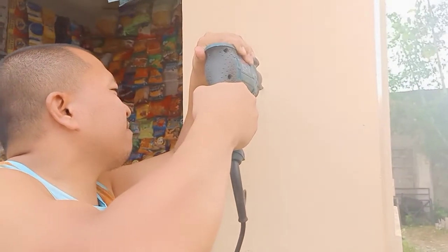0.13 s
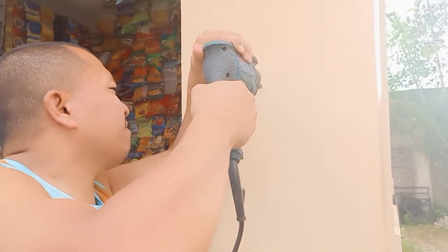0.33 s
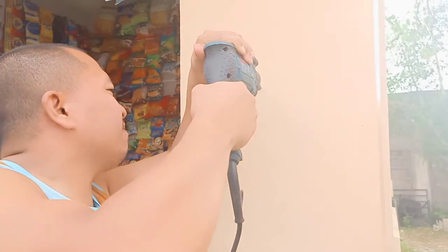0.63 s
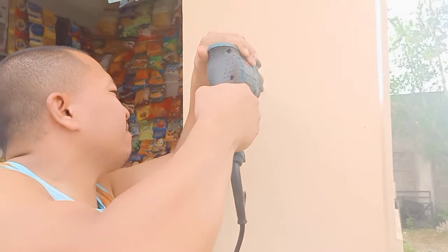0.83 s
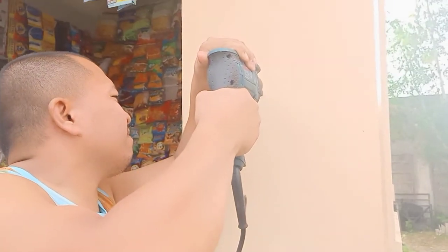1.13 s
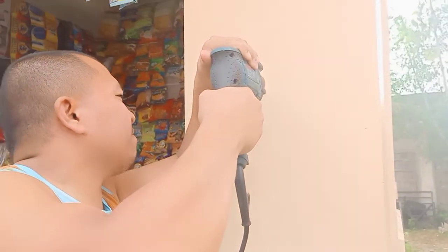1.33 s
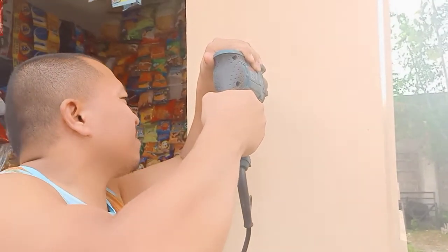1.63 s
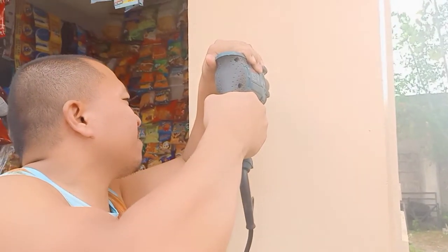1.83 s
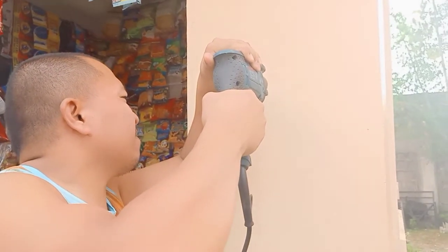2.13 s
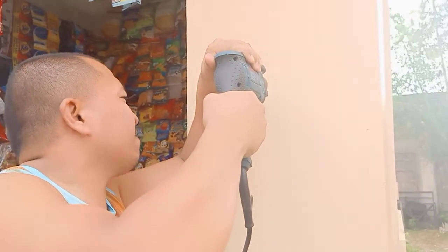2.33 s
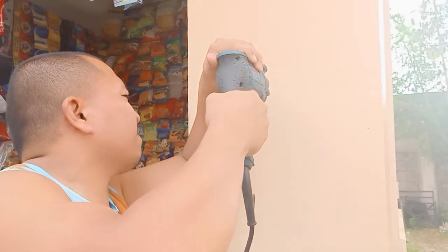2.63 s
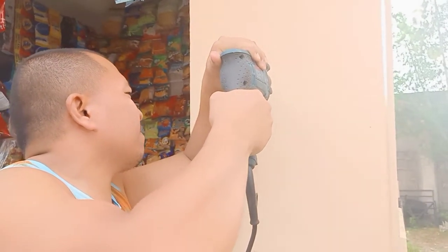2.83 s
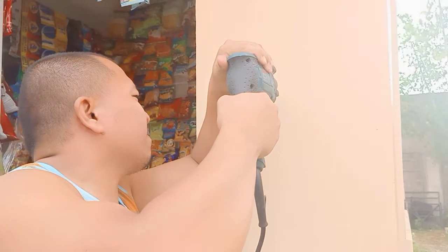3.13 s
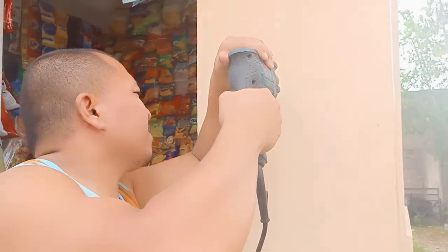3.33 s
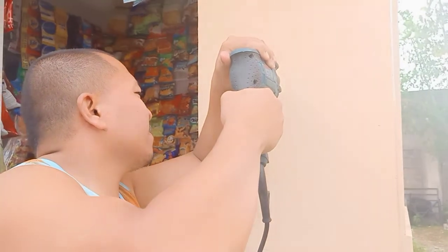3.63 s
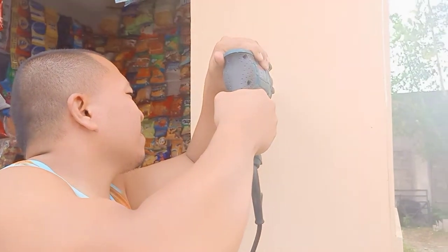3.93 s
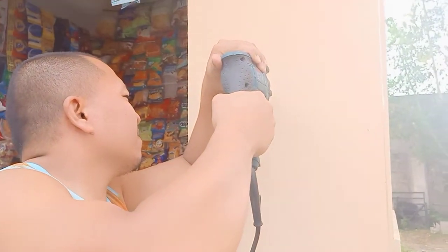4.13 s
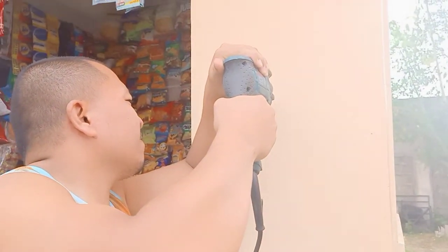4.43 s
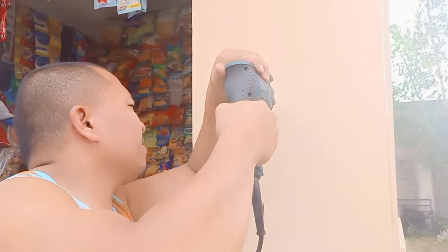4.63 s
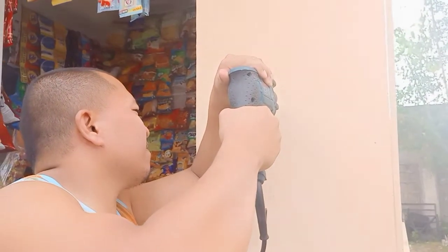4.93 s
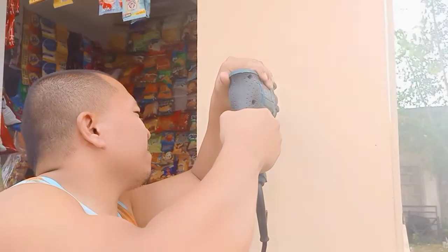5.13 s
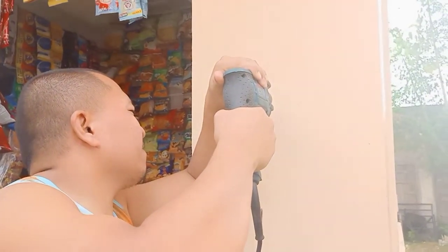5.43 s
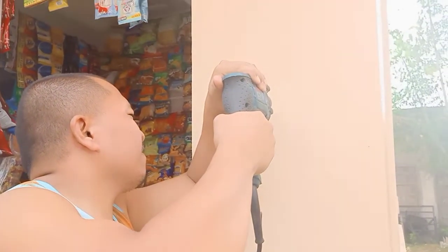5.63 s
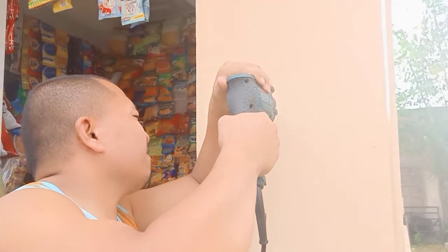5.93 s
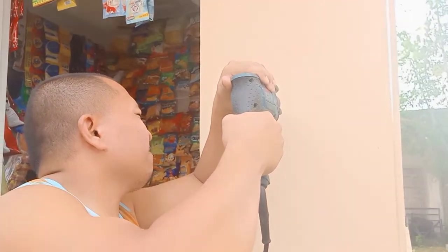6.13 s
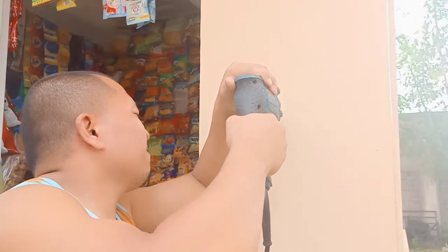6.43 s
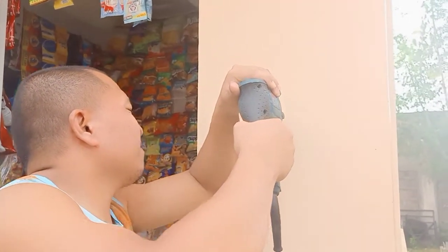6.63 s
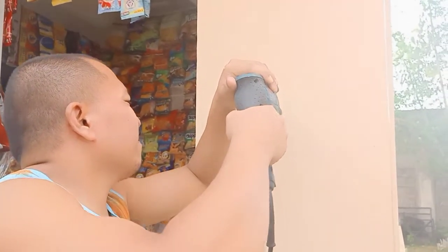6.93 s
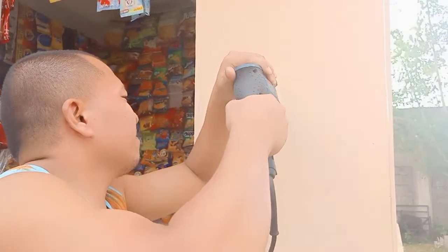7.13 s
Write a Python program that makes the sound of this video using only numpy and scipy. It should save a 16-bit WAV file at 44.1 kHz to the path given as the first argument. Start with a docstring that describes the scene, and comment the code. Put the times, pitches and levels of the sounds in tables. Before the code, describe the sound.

An electric drill grinds steadily into a wall, squealing and rattling, surges to a faster whine, then winds down amid low wind thumps.

```python
"""Outdoors at a plastered wall: a corded drill bores in, heard close up by two microphone ports.
Shaft-locked tones make the gear whine, inside a noise roar and fan hiss that throb twice a turn.
Noise bands and short narrow-band cries make the bit rub and squeal; loose parts rattle and knock.
The trigger is squeezed harder, the motor races, then coasts down. Shaped noise and blunt pushes
are the wind buffeting the ports."""
import sys
import numpy as np
from scipy.fft import rfft, irfft, next_fast_len
from scipy.io import wavfile
from scipy.ndimage import map_coordinates

SR = 44100
rng = np.random.default_rng(int(sys.argv[2]) if len(sys.argv) > 2 else 0)


def to_wav(sig):
    """Store sig (one row per channel, or 1-D mono) as 16-bit WAV at the path in sys.argv[1].

    Samples outside -1..1 are clipped; the rate is SR.
    """
    pcm = np.clip(np.atleast_2d(sig), -1, 1) * 32767
    pcm = np.round(pcm).astype(np.int16)
    wavfile.write(sys.argv[1], SR, pcm.T)  # frames by channels


N = 321930

# Listed levels are settings ahead of the modulation and trims in the functions.
# Left-right dB is positive towards the left; spectra give relative density.

# Breeze over time. Each row: time in seconds, strength in dB, left-right in dB.
BREEZE = [(0, -41.5, 7), (.3, -38.5, -9), (.5, -43.5, -6.5), (.85, -48.5, 11), (1.2, -49, 1),
          (1.5, -41.5, 3), (1.8, -47, 17), (2.2, -52, 16), (3.4, -50.5, 5.5), (3.65, -46.5, 16),
          (3.86, -37, 4.5), (4.5, -37.5, 2), (4.75, -42, 7), (5.05, -34.5, 12.5), (5.4, -36.5, 7),
          (5.78, -52, 6), (5.95, -46, 2), (6.35, -40.5, 17.5), (6.46, -53.5, 18), (6.55, -52.5, 7),
          (6.66, -52, 3), (6.76, -38, 11), (6.95, -44.5, 8), (7.13, -43, 8), (7.18, -58, 14),
          (7.3, -51, -4)]
# Single buffets. Each row: start in seconds, peak in dB, left-right in dB, flutter over the buffet in dB.
BUFFETS = [(.03, -41.5, 9, 5), (0.046, -44, -19, 8), (.14, -42.5, -17, 3.5), (.186, -39, -12, 2),
           (0.237, -34, -5, 5), (.275, -41, 8, -6), (.303, -47, -9, 4), (0.387, -38, -15, 2),
           (0.45, -33, -3.5, -6), (0.681, -33.5, 9, -4), (1.29, -37, 0, -17), (1.39, -38.5, 13, 4),
           (1.47, -40, -14, 4), (1.748, -42, -16, 3), (1.96, -44.5, 28, -11), (2.81, -45.5, 20, -15),
           (3.181, -37.5, 11, -3), (3.49, -43, 14, -9), (3.682, -38, 27, -5), (3.848, -35.5, 7, 0),
           (3.938, -40, -7, 9), (3.977, -30, 2, 7), (4.082, -25, 12.5, -2), (4.125, -34, 10, -5),
           (4.149, -27.5, 6, 3), (4.221, -32, -6, 0), (4.412, -26.5, 8.5, 9), (4.432, -34, 2, 1),
           (4.463, -37, -6, 5), (4.515, -37, 9, 5), (4.631, -41.5, -7, 6), (4.848, -34, 23, -18),
           (4.947, -38, -17, -0.5), (5.03, -30.5, 15, 2), (5.109, -31.5, 18, -9), (5.18, -42, 16, 7),
           (5.851, -39, -0.5, -2), (5.959, -42, -17, 6), (6.029, -42.5, -11, 7), (6.21, -41, 21, -14),
           (6.41, -46, 18, 3), (6.675, -41, -9, -1), (6.71, -36.5, 12, 5), (6.79, -37.5, 22, 2.5),
           (6.85, -35, 17, -2), (6.9, -45, 9, 4), (7.11, -46, 20, -1)]
# Low rush of the wind and its higher flutter. Each row: frequency in Hz, density in dB per Hz.
BUFFET_SPECTRUM = [(15, -80), (30, -47), (50, -11.5), (97, 1.5), (188, -1.5), (221, -3.5), (267, -5),
                   (400, -14.5), (520, -64), (880, -120)]
FLUTTER_SPECTRUM = [(120, -29), (200, -1), (397, 3), (434, 1.5), (551, -1.5), (900, -18), (1170, -24),
                    (1980, -120)]
BUFFET_RISE_S, BUFFET_FALL_S = 0.00883, 0.013
BUFFET_CROSS_S = .016  # a buffet passes the left port first
THUMP_DB = -2  # front of a buffet, over its listed peak
# Flutter over a breeze of -42.5 dB, extra dB per dB of breeze, and its left-right shift
BREEZE_FLUTTER_DB, FLUTTER_GROWS, FLUTTER_PAN_DB = -3.5, 0.59, -7.5

# Likeness of the two ports. Each row: frequency in Hz, left-right correlation.
ALIKE = [(300, 1), (700, 0.99), (1250, 0.98), (1650, 0.79), (2400, 0.69), (3150, 0.23), (3900, 0.27),
         (4700, 0.12), (7000, 0.39), (9900, 0.14), (15000, 0.37)]
# Balance of the drill. Each row: frequency in Hz, left-right in dB.
LEAN = [(400, -1.5), (770, 2), (1170, -1.5), (1790, -0.1), (2740, -3), (4190, -7.5), (6410, -3.5),
        (8200, 10.5), (9800, 2), (10800, -2), (11400, -0.5), (12500, -0.5), (15000, -1)]
# Phase of the drill between ports. Each row: frequency in Hz, lead of the left in radians.
LEAD = [(800, -0.38), (1650, 0.74), (2400, -1), (3150, -0.6), (3900, -1.5), (4700, -0.33), (8400, -1.33),
        (11400, 0.23)]
TOP_HZ = 15725

# Chuck rattles. Each row: start in seconds, peak in dB, pitch in Hz, knock of the housing in dB.
RATTLES = [(2.074, -38, 3700, -40), (2.48, -30, 3600, -36), (2.584, -37, 3760, -38),
           (2.613, -35, 3770, -34), (3.28, -28.5, 3780, -38), (4.678, -32, 3700, -36),
           (4.7085, -18.5, 3200, -30), (4.759, -29, 3650, -33), (4.809, -33, 3800, -32),
           (4.856, -29, 3800, -28), (4.902, -27, 3400, -27), (4.948, -35, 3700, -29),
           (5.033, -29, 3700, -30), (5.112, -27, 4300, -32), (5.151, -27, 3850, -27),
           (5.189, -26, 4280, -35), (5.228, -27, 3920, -31), (5.301, -28, 4300, -34),
           (6.387, -26, 4060, -28), (6.493, -20, 2580, -33), (6.528, -20, 2520, -33),
           (6.564, -23, 2620, -29), (6.6, -23, 2530, -28), (6.746, -28, 2600, -33), (6.801, -27, 2710, -31),
           (6.808, -28, 2600, -35), (6.846, -32, 2400, -33), (6.886, -37, 3700, -32),
           (7.0, -25.5, 3800, -27), (7.045, -20, 3800, -28), (7.047, -32, 1750, -32),
           (7.068, -28, 3800, -40), (7.0698, -27, 2600, -27), (7.088, -31, 3500, -35),
           (7.093, -26, 3950, -33), (7.095, -29, 1640, -31), (7.118, -31, 2250, -36),
           (7.14, -28.5, 3600, -32), (7.166, -27, 2850, -39), (7.184, -28.5, 2750, -39),
           (7.235, -33, 2750, -40)]
# Snap of the housing under a rattle. Each row: frequency in Hz, density in dB per Hz.
SNAP_SPECTRUM = [(500, -60), (1100, -8), (1700, -1), (2550, 0), (3300, 0), (4200, -3), (4800, -10),
                 (7000, -12), (9000, -60)]
RATTLE_PAN_DB, RATTLE_PAN_DB_PER_KHZ = -9.5, 1  # left-right at 2.6 kHz; higher rattles lean less to the right

# The bit grabs the side of the hole. Each row: start in seconds, peak in dB, pitch in Hz.
SQUEAKS = [(.1055, -31, 8300), (.2107, -23.5, 8170), (.2798, -20, 8170), (.3315, -21, 8350),
           (.38, -33, 8100), (.4379, -29, 8140), (1.0006, -30, 8740), (1.05, -32.5, 8450),
           (1.0979, -36, 8090), (2.095, -22.5, 8360), (2.1448, -27, 8340), (2.198, -25.5, 8500),
           (2.3536, -26, 8420), (2.494, -31, 8500), (2.5466, -33, 8640), (3.021, -33, 9200),
           (3.4371, -34, 9400), (3.5418, -31, 9350), (3.697, -34, 8800), (3.7559, -30, 8900),
           (4.243, -30, 8250), (4.2686, -26.5, 9800), (4.3071, -28.5, 8800), (4.4233, -26.5, 8970),
           (4.5625, -28.5, 8800), (4.6159, -31, 8400), (4.6663, -29.5, 8500), (4.8693, -34, 9640),
           (4.9726, -29, 9300), (5.101, -18, 10050), (5.1402, -23, 8900), (5.1731, -27, 9550),
           (5.248, -31, 8300)]
# Grabs once a turn. Each row: time in seconds, peak in dB, pitch in Hz, scatter in Hz, angle in turns.
RUN = [(5.34, -35, 9600, 500, 0), (5.85, -29, 9600, 500, 0.003), (6.03, -26.5, 8920, 150, 0.051),
       (6.22, -25, 8520, 80, 0), (6.46, -30.5, 8080, 80, 0.2)]
SQUEAK_PAN_DB, PAN_DB_PER_KHZ = 20, -6  # left-right at 8.3 kHz; higher squeaks are nearer the middle

# The rubbing bit. Each row: time in seconds, rub in dB, ring in dB, chirp pitch in Hz.
BIT = [(0, -51, -68, 9900), (.6, -61.5, -69, 9750), (1.9, -63, -66, 9200), (2.35, -50.5, -55, 9400),
       (2.7, -49, -58.5, 10500), (3.1, -50.5, -47, 10850), (3.35, -49, -53, 10200), (4, -51.5, -51, 9940),
       (4.15, -46, -43, 9940), (4.75, -44.5, -44.5, 9740), (5, -46, -36.5, 10000),
       (5.15, -40.5, -37.5, 9700), (5.3, -44, -41.5, 9900), (5.7, -43, -39.5, 10050), (6, -42, -43, 9620),
       (6.3, -43.5, -41, 9060), (6.45, -56, -53, 9000), (6.62, -59, -51, 9800), (6.75, -59, -64, 10500),
       (7.3, -64, -68, 10300)]
# Rasp of the rub. Each row: frequency in Hz, density in dB per Hz.
RUB_SPECTRUM = [(4710, 2), (8000, -4), (8300, -21.5), (9040, 21.5), (10800, 19), (11200, -14), (14600, -41),
                (22000, -120)]
# Where the side of the bit catches. Each row: time in seconds, angle in turns.
CATCH = [(0, 0.86), (2.8, 0.77), (3.6, 0.93), (4.4, 0.9), (5.3, 0.98), (7.3, .96)]
# Level of the highest treble, which comes and goes. Each row: time in seconds, level in dB.
TREBLE = [(0, -52), (4, -54.5), (4.15, -67), (5, -67), (5.3, -46), (6, -42), (6.25, -45), (6.4, -54),
          (6.85, -61), (7.3, -60)]
# High noise around and above the ring, under load and racing. Each row: frequency in Hz, density in dB per Hz.
HIGH_LOADED = [(6240, -9.5), (10900, -7.5), (11300, 0), (12200, -1), (12600, -11), (13100, -5), (13800, -9),
               (15600, -30)]
HIGH_RACING = [(6820, -35), (11600, -6), (12000, 1), (12700, 5), (13500, -7), (14200, -20), (14400, -37),
               (15600, -67)]
RING_HZ, RING_WIDTH_HZ = 11410, 320  # long-axis mode of the bit
CHIRP_DB, CHIRP_RACING_DB = 13.5, -2.5  # over the rub; change at full speed
# A flute clips the hole's edge at this turn: its ring and its chirp over the steady ring
PING_TURN, PING_DB, PING_CHIRP_DB = .56, 9, 5.5

# Plaster chips heard through the housing. Each row: frequency in Hz, density in dB per Hz.
CHIP_SPECTRUM = [(500, -60), (1100, -10), (1700, 0.5), (2100, -3.5), (2550, 6.5), (3300, 1), (4200, -12),
                 (7000, -8.5), (9000, -60)]
CHIPS_PER_S, CHIP_SPREAD_DB, CHIPS_DB = 900, 6, -9  # average rate; scale of sizes; over the listed roar

# Chuck speed. Each row: time in seconds, speed in turns per second.
SPEED = [(0, 18.99), (.15, 19.01), (.45, 19.28), (.75, 19.62), (.9, 19.85), (1.2, 19.97), (1.35, 19.78),
         (1.5, 19.42), (1.8, 19.55), (2.3, 19.35), (2.7, 19.4), (3.45, 19.19), (3.6, 19.2), (4.05, 19.44),
         (4.2, 19.37), (4.35, 19.38), (4.65, 19.29), (4.73, 19.39), (4.78, 20.6), (4.88, 21.7),
         (4.95, 22.75), (5.05, 24.4), (5.15, 25.95), (5.25, 27.2), (5.35, 28.05), (5.45, 28.95),
         (5.6, 29.75), (5.75, 30.43), (5.9, 30.78), (6.3, 31.45), (6.38, 31.2), (6.4, 30.87), (6.6, 26.46),
         (6.9, 22.13), (7.3, 19.79)]
START_TURN = .03
SQUEEZE_S, RELEASE_S = 4.76, 6.38  # trigger pulled fully, let go
# Roar. Each row: time in seconds, level in dB.
ROAR = [(0, -31.5), (.71, -31), (1.36, -31.5), (2.77, -32), (4.65, -32), (4.9, -29.5), (5.2, -27),
        (5.31, -28), (5.71, -26), (5.88, -27.5), (6.18, -27), (6.69, -32.5), (7.01, -34.5), (7.08, -33.5),
        (7.22, -36), (7.3, -37)]
# Housing roar under load and racing. Each row: frequency in Hz, density in dB per Hz.
ROAR_LOADED = [(240, -22), (400, -14), (470, -8), (514, -15.5), (610, -7.5), (807, -8), (1160, -2),
               (1360, -5), (1630, -4), (1860, -5.5), (2390, -1), (3040, -3), (3190, -2), (3560, -9),
               (4400, -18.5), (5720, -51), (9680, -120)]
ROAR_RACING = [(240, -56), (400, -17.5), (709, -5), (816, -10.5), (1050, 1), (1490, 3), (1660, -6),
               (1990, 1), (2430, 1), (2590, 0), (3100, -4), (3360, -7.5), (3640, -9.5), (3860, -18),
               (4400, -10), (5720, -76), (9680, -120)]
# Shell modes of the housing. Each row: centre in Hz, width in Hz, level under load in dB.
HOUSING = [(1150, 54, -60.5), (2325, 70, -48), (2550, 63, -53.5), (3067, 53, -54), (3363, 77, -62)]
# Rise of each shell mode at full speed, in dB.
HOUSING_RISE = [-2.5, 4, -7, -12, 15]
# Fan and grit hiss. Each row: frequency in Hz, density in dB per Hz.
HISS_SPECTRUM = [(2240, -45), (3800, -3.5), (4130, -10), (5470, -1.5), (6100, 3), (6600, 3), (7120, 5),
                 (8110, -0.5), (8280, 0), (9000, -10), (11700, -44), (19800, -120)]
HISS_DB, HISS_GROWS = -40.5, 1.65  # while boring; dB of hiss per dB of roar
HISS_COAST_DB = 1.5  # lift of the fan hiss against the falling roar
WALL_HZ, WALL_COAST = 547, 0.73  # below this the wall hums with the cutting; share lost without current

# Gear and motor tones. Each entry: vibrations per chuck turn.
ORDERS = [42, 84, 126, 168, 252, 410, 120, 132]
# Speeds at which the tone levels are set, in turns per second.
TONE_SPEEDS = [20, 20.35, 23.5, 26.4, 27.7, 29, 30.2, 30.6, 31.05, 31.4]
# Tones sweeping through the housing's resonances. Each row: level in dB at each of those speeds.
# In order: tooth rate, its 2nd, 3rd, 4th and 6th multiples, commutator,
# then the 3rd less and plus one turn of the rotor.
TONES = [
    [-69, -70, -40, -50, -56, -48, -48, -46, -48, -51],
    [-47, -52, -54, -44, -38, -44, -42, -36, -35, -35.5],
    [-40.5, -36.5, -37, -35.5, -41.5, -53, -50, -48, -45, -48],
    [-43.5, -48, -56, -60, -62, -62, -60, -57, -56, -57],
    [-62, -57, -50, -59, -50, -54, -43, -51, -53, -60],
    [-50.5, -62, -66, -69, -70, -70, -70, -70, -70, -70],
    [-47.5, -49, -53, -50, -60, -65, -65, -65, -65, -65],
    [-47.5, -54, -58, -60, -62, -65, -63, -65, -65, -65],
]
# Swing of each tone twice a turn, as a share of its level; 1 reaches silence.
THROB = [.8, 1.6, 1.0, 1.4, .5, .1, .3, .3]
# Backlash shake of each tone, as a scale in radians.
BLUR = [.3, .17, .4, .42, .4, .3, .55, .55]
# Lead and lag of each tone twice a turn, in radians.
SWAY = [0, .25, -.4, -.35, .2, 0, 0, 0]
# Unsteadiness of each tone, in dB.
SCATTER = [1.5, .9, 1.7, 1.4, 1.2, 1.2, 2.4, 2.4]
# Drift of each tone as the hole deepens, in dB per second.
DEEPENING = [0.1, 0.1, -2.2, 0.1, 0.1, -2.5, -.1, .1]
# Change of each tone without current, in dB.
COAST = [-10, -8, -22, -7, -2, -16, -8, -8.5]
COAST_S = 0.17  # time for the coasting change to complete

SIDES = np.array([[.5], [-.5]])  # splits a left-right dB between the ports


def amp(db):
    """Gain of a level in dB."""
    return 10 ** (np.asarray(db) / 20)


def unit(x):
    """Scaled to rms 1."""
    return x / np.sqrt(np.mean(x ** 2) + 1e-20)


def along(points, hz):
    """(Hz, value) points joined on a log frequency axis."""
    f, v = np.transpose(points)
    return np.interp(np.log(hz + 1), np.log(f + 1), v)


def curves(rows):
    """One value per sample for each column after the time."""
    s, *cols = np.transpose(rows)
    return np.array([np.interp(np.arange(N) / SR, s, c) for c in cols])


def wobble(rate):
    """A smooth random curve, rate knots a second."""
    return map_coordinates(rng.standard_normal(int(N * rate / SR) + 4), [np.arange(N) * rate / SR])


def filtered(x, response):
    """Sound shaped by a response of frequency."""
    m = next_fast_len(N + 8192)
    return irfft(rfft(x, m) * response(np.fft.rfftfreq(m, 1 / SR)), m)[..., :N]


def rush(spectrum, alike=ALIKE):
    """Stereo noise of a given colour and left-right likeness, whose mid has rms 1."""
    def mid_side(hz):
        turn = np.arccos(np.clip(along(alike, hz), -1, 1)) / 2
        return amp(along(spectrum, hz)) * [np.cos(turn), np.sin(turn)]

    mid, side = filtered(rng.standard_normal((2, N)), mid_side)
    return np.array([mid + side, mid - side]) / np.std(mid)


def resonance(centre_hz, width_hz, alike=ALIKE):
    """Noise ringing in one mode."""
    hz = centre_hz + width_hz * np.linspace(-12, 12, 97)
    density_db = -20 * np.log10(1 + (2 * (hz - centre_hz) / width_hz) ** 2)
    return rush(np.c_[hz, density_db], alike)


def bursts(events, rise, t60, spread_hz, rough, gain_db):
    """Short narrow-band cries: three close partials under a quick swell and a decay of varied length."""
    out, t = np.zeros((2, N + SR)), np.arange(SR // 20) / SR
    chance = rng.uniform(-1.37, 1, (len(events), 6))
    for (s, db, hz, pan_db), c in zip(events, chance):
        swell = np.sin(np.pi / 2 * np.clip(t / rise, 0, 1)) ** 2
        decay = amp(-60 * np.maximum(t - rise, 0) / (t60 * amp(6.6 * c[0])))
        above_hz = hz + spread_hz * (1 + .5 * c[1])
        below_hz = hz - spread_hz * (1 + .5 * c[3])
        tone = np.sin(2 * np.pi * hz * t)
        tone += rough * np.sin(2 * np.pi * above_hz * t + np.pi * c[2])
        tone += rough * np.sin(2 * np.pi * below_hz * t + np.pi * c[4])
        out[:, round(s * SR):][:, :len(t)] += amp(db + gain_db + SIDES * pan_db) * swell * decay * tone
    return out[:, :N]


def angle():
    """Chuck angle in radians, summed from its speed."""
    return 2 * np.pi * (np.cumsum(curves(SPEED)[0]) / SR + START_TURN)


def racing():
    """0 up to 20 turns per second, 1 from 27 upwards."""
    return np.clip((curves(SPEED)[0] - 20) / 7, 0, 1)


def coasting():
    """0 under current, ramping to 1 once the trigger is let go."""
    return np.clip((np.arange(N) / SR - RELEASE_S) / COAST_S, 0, 1)


def passes(turn):
    """Samples at which the chuck passes an angle, given in turns."""
    return np.flatnonzero(np.diff(np.floor(angle() / (2 * np.pi) - turn)))


def each_turn(turn, db, hz, scatter):
    """One cry a turn, scattered in time, level and pitch: rows (s, peak dB, Hz, left-right dB)."""
    at = passes(turn)
    c = rng.standard_normal((len(at), 3))
    late_s = .002 * abs(c[:, 0])
    return np.c_[at / SR + late_s, db[at] + 3 * c[:, 1], hz[at] * (1 + scatter * c[:, 2]), np.full(len(at), 4.)]


def arrivals(s, pan_db):
    """Left and right time of a buffet's peak, from its start at the louder port."""
    return s + BUFFET_RISE_S + BUFFET_CROSS_S * (np.array([0, 1]) - (pan_db < 0))


def wind():
    """Turbulence at the ports: a lumpy breeze that wanders from side to side, and single buffets."""
    def lumps(depth_db):
        return depth_db * np.array([wobble(25), wobble(25)])

    t = np.arange(N) / SR
    strength_db, lean_db = curves(BREEZE)
    breeze_db = strength_db + SIDES * (lean_db + 3 * wobble(7.4))
    flutter_rise_db = BREEZE_FLUTTER_DB + FLUTTER_GROWS * (strength_db + 42.5)
    low_power = amp(breeze_db + lumps(2.2)) ** 2
    flutter_power = amp(breeze_db + flutter_rise_db + lumps(1.7) + 1.3 * wobble(8.9)) ** 2
    for s, db, pan_db, flutter_db in BUFFETS:
        span = slice(max(round((s - .1) * SR), 0), round((s + .3) * SR))
        u = t[span] - arrivals(s, pan_db)[:, None]
        shape = np.where(u < 0, np.exp(-(u / BUFFET_RISE_S) ** 2), np.exp(-np.abs(u) / BUFFET_FALL_S))
        power = amp(db + SIDES * pan_db) ** 2 * shape
        low_power[:, span] += power
        flutter_power[:, span] += power * amp(flutter_db) ** 2
    low = np.sqrt(low_power) * rush(BUFFET_SPECTRUM, [(30, 0.055)])
    flutter = np.sqrt(flutter_power) * rush(FLUTTER_SPECTRUM, [(30, 0.032)])
    return amp(-4.0) * low + amp(-7.5 + SIDES * FLUTTER_PAN_DB) * flutter


def thumps():
    """The front of each buffet strikes the ports as one blunt push, in the colours of rush and flutter."""
    push = np.zeros((2, 2, N))  # colour, port, time
    for s, db, pan_db, flutter_db in BUFFETS:
        at = np.round(arrivals(s, pan_db) * SR).astype(int)
        balance_db = np.add.outer([0, flutter_db], [pan_db / 2, -pan_db / 2])
        push[:, [0, 1], at] = amp(db + THUMP_DB + balance_db)
    grid = np.linspace(0, SR / 2, 4000)

    def strike(p, colour):
        mean_gain = amp(along(colour, grid)).mean()
        return filtered(p, lambda hz: amp(along(colour, hz)) / mean_gain)

    return strike(push[0], BUFFET_SPECTRUM) + strike(push[1], FLUTTER_SPECTRUM)


def rattles():
    """The chuck rattles in short cries whose pitch sets their place between the ports."""
    rows = [(s, db, hz, RATTLE_PAN_DB + RATTLE_PAN_DB_PER_KHZ * (hz - 2600) / 1000)
            for s, db, hz, _ in RATTLES]
    return bursts(rows, rise=.003, t60=.034, spread_hz=220, rough=.5, gain_db=-3.5)


def knocks():
    """Each rattle also jolts the housing: a short broad snap of noise."""
    jolt, t = np.zeros(N + SR), np.arange(SR // 20) / SR
    for s, *_, knock_db in RATTLES:
        jolt[round(s * SR):][:len(t)] += amp(knock_db - 60 * t / 0.027) * np.clip(t / 0.0004, 0, 1)
    return jolt[:N] * rush(SNAP_SPECTRUM)


def squeaks():
    """Single grabs, plus a run of them once a turn; the pitch sets the side they are heard from."""
    db, hz, scatter_hz, grab = curves(RUN)
    at = passes(grab)
    at = at[(at > RUN[0][0] * SR) & (at < RUN[-1][0] * SR)]
    c = rng.standard_normal((len(at), 3))
    run = np.c_[at / SR + .001 * c[:, 0], db[at] + 1.8 * c[:, 1], hz[at] + scatter_hz[at] * c[:, 2]]
    rows = np.r_[SQUEAKS, run]
    pan_db = SQUEAK_PAN_DB + PAN_DB_PER_KHZ * (rows[:, 2] - 8300) / 1000
    return bursts(np.c_[rows, pan_db], rise=.0022, t60=.024, spread_hz=200, rough=.45, gain_db=-3)


def bit():
    """The bit rubs in its hole: a rasp, chirps and a ping each turn, and its own ring. Apart from the bit, a
    high noise rides on top of it all; its level comes and goes."""
    rub_db, ring_db, chirp_hz = curves(BIT)
    top_db, catch = curves(TREBLE)[0], curves(CATCH)[0]
    a, fast = angle(), racing()
    rub = amp(rub_db + 1.3 * np.cos(a) + 1.6 * wobble(30)) * rush(RUB_SPECTRUM)
    ring_level = amp(ring_db - 2.5 + 1.8 * np.cos(2 * a - 1.2) + 1.8 * wobble(30))
    ring = ring_level * resonance(RING_HZ, RING_WIDTH_HZ, [(30, 0.24)])
    high_noise = np.sqrt(1 - fast) * rush(HIGH_LOADED, [(30, 0.1)])
    high_noise += np.sqrt(fast) * rush(HIGH_RACING, [(30, -.1)])
    top = amp(top_db + 2 * np.cos(a) + 1.9 * wobble(25)) * high_noise
    catches = each_turn(catch, rub_db + CHIRP_DB + CHIRP_RACING_DB * fast, chirp_hz, .03)
    clips = each_turn(PING_TURN, ring_db + PING_CHIRP_DB - 6 * fast, .96 * chirp_hz, .03)
    pings = each_turn(PING_TURN, ring_db + PING_DB, np.full(N, RING_HZ), 0.0054)
    cries = bursts(np.r_[catches, clips], rise=0.0015, t60=0.027, spread_hz=410, rough=0.91, gain_db=-4.0)
    return rub + ring + top + cries + bursts(pings, rise=.0012, t60=0.038, spread_hz=130, rough=.4, gain_db=-3)


def chips():
    """Irregular tiny impacts of the tip, more of them as each lip bites, heard through the housing."""
    density = CHIPS_PER_S / SR * (1 + 0.43 * np.cos(2 * angle()))
    struck = rng.random(N) < density
    size = amp(CHIP_SPREAD_DB * rng.uniform(-1.2, 1, N))
    hits = struck * size * rng.choice([-1, 1], N)
    return amp(curves(ROAR)[0] + CHIPS_DB) * unit(filtered(hits, lambda hz: amp(along(CHIP_SPECTRUM, hz))))


def motor():
    """Roar of the housing and fan hiss, pulsing with the turn and shaken by grit under the tip."""
    roar_db, = curves(ROAR)
    change_db = roar_db - roar_db[SR]  # against the roar at one second
    a, fast = angle(), racing()
    lips, grit = np.cos(2 * a), wobble(160) + 0.5 * wobble(45)
    roar = np.sqrt(1 - fast) * rush(ROAR_LOADED) + np.sqrt(fast) * rush(ROAR_RACING)
    roar *= amp(roar_db - 2.0)
    wall_hum = filtered(roar, lambda hz: 1 / (1 + (hz / WALL_HZ) ** 8))
    roar -= WALL_COAST * coasting() * wall_hum
    for (hz, width_hz, db), rise_db in zip(HOUSING, HOUSING_RISE):
        roar += amp(db + rise_db * fast + change_db) * resonance(hz, width_hz)
    hiss_db = HISS_DB + HISS_GROWS * change_db + HISS_COAST_DB * coasting()
    hiss = amp(hiss_db + 0.75 * lips + 0.17 * np.cos(a) + 1.03 * grit) * rush(HISS_SPECTRUM)
    return roar * amp(0.5 * lips + 0.53 * grit) + hiss


def tone_levels():
    """Each tone follows the speed, drifts with the deepening hole up to the squeeze, sinks without current."""
    t, speed = np.arange(N) / SR, curves(SPEED)[0]
    boring_s = t * (t < SQUEEZE_S)
    return [np.interp(speed, TONE_SPEEDS, db) + drift_db * boring_s + loss_db * coasting()
            for db, drift_db, loss_db in zip(TONES, DEEPENING, COAST)]


def gears():
    """Tones locked to the shaft; the two cutting lips load the gears twice a turn, never quite alike."""
    a = angle()
    tones = np.zeros((2, N))
    settings = zip(ORDERS, tone_levels(), THROB, BLUR, SWAY, SCATTER)
    for order, db, depth, blur, sway, scatter_db in settings:
        bite = 2 * a + .25 * wobble(30)
        load = 1 + depth * (np.cos(bite) + 0.041 * np.cos(a))
        slack = blur * (wobble(12) + .85 * wobble(95)) + sway * np.sin(bite)
        ports = .42 * np.array([wobble(22), wobble(20)])  # reflections reach each port differently
        level = amp(db + scatter_db * wobble(45)) * load
        tones += level * np.sqrt(2) * np.sin(order * a + slack + ports)
    return tones


def scene():
    """The drill reaches the two ports with unequal strength and phase; its cries and the wind join it."""
    def ports(hz):
        balance = amp(np.outer([.5, -.5], along(LEAN, hz)))
        return balance * np.exp(1j * np.outer([.5, -.5], along(LEAD, hz)))

    drill = filtered(motor() + gears() + bit() + chips() + knocks(), ports)
    return wind() + thumps() + rattles() + squeaks() + drill


def record(dry):
    """The ports pass nothing above their band limit."""
    return filtered(dry, lambda hz: hz < TOP_HZ)


dry = scene()
out = record(dry)
to_wav(out)
```